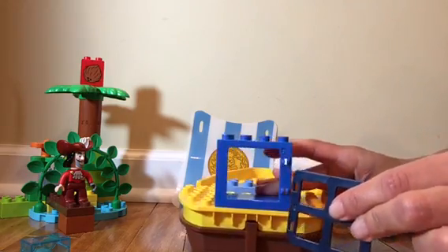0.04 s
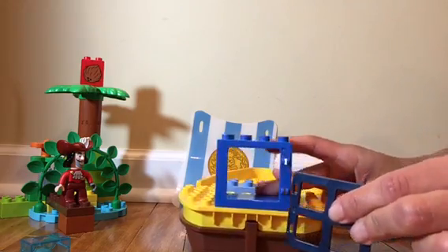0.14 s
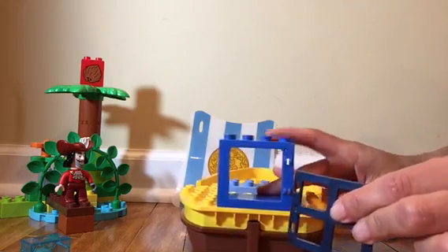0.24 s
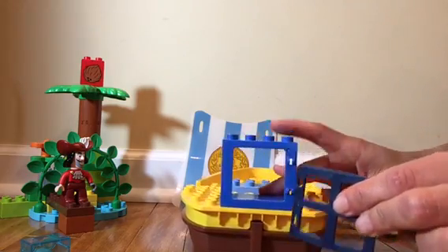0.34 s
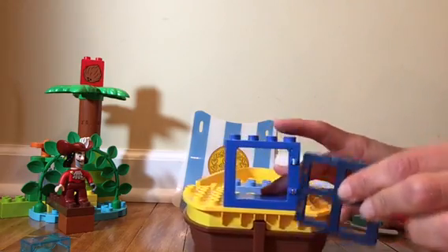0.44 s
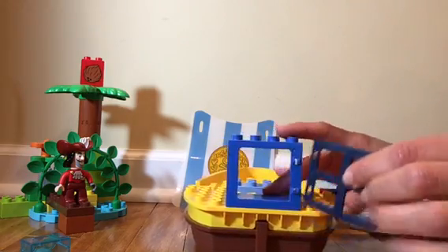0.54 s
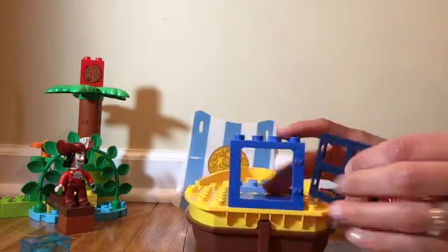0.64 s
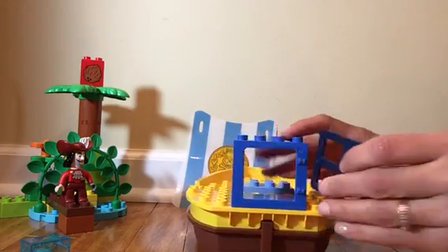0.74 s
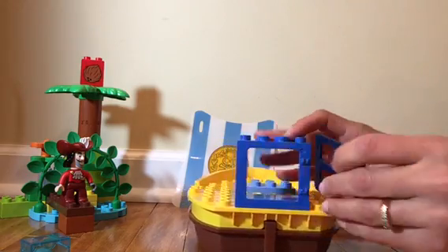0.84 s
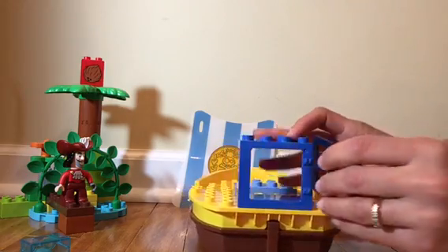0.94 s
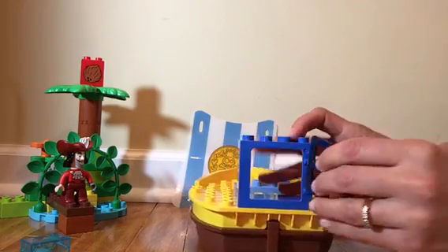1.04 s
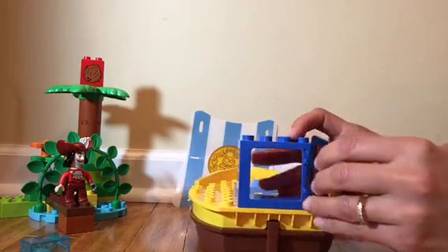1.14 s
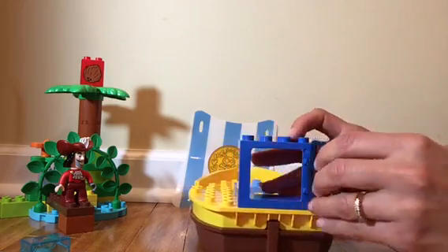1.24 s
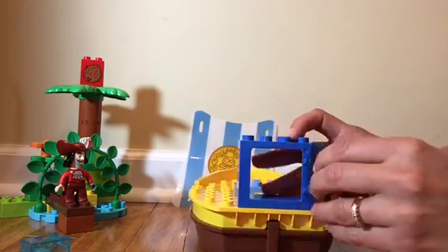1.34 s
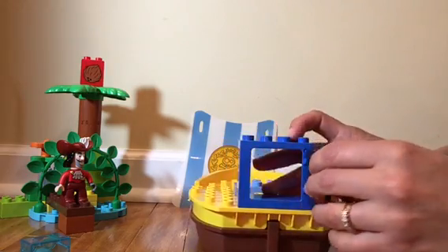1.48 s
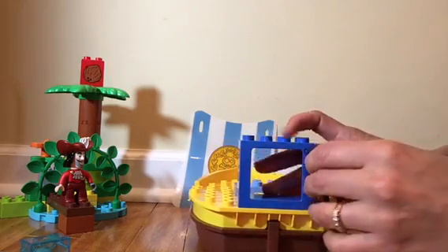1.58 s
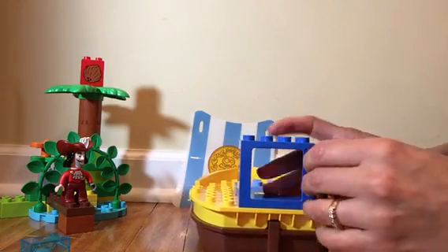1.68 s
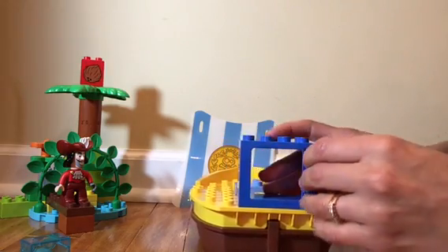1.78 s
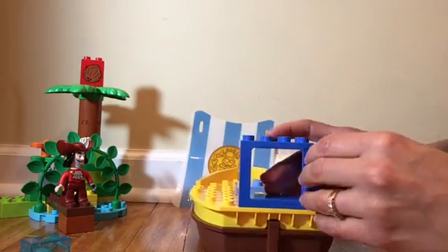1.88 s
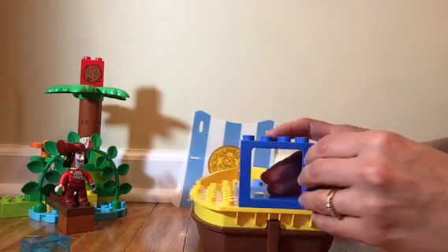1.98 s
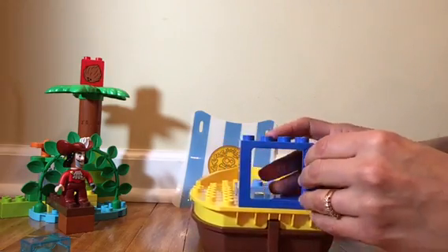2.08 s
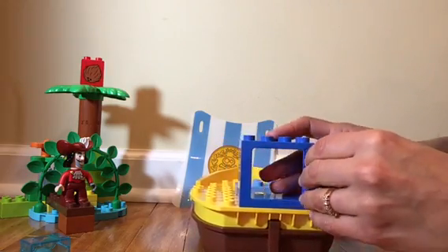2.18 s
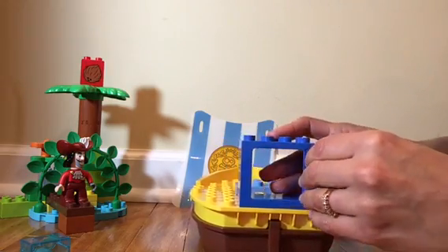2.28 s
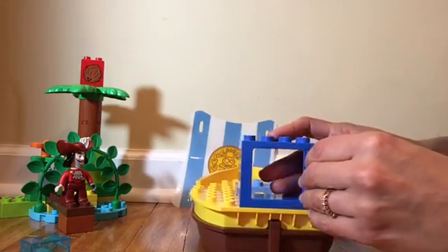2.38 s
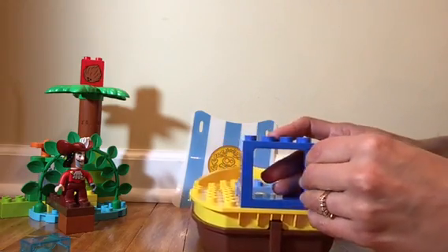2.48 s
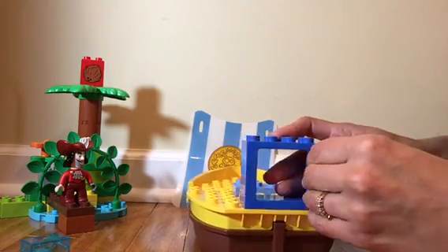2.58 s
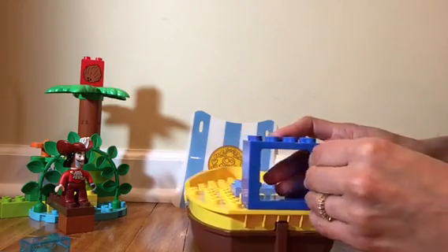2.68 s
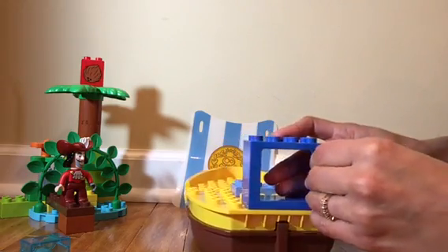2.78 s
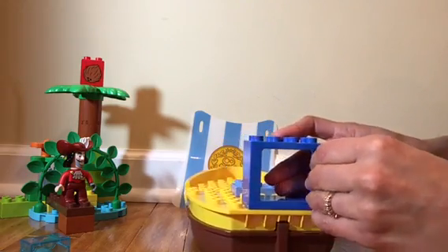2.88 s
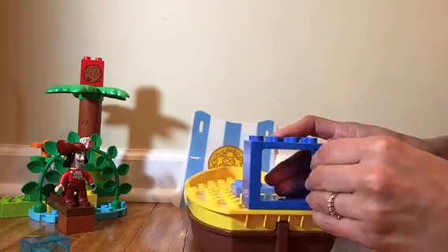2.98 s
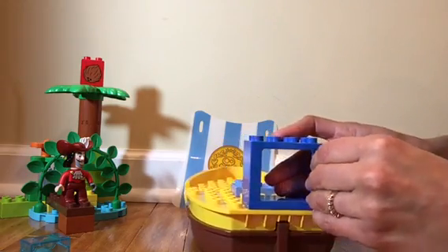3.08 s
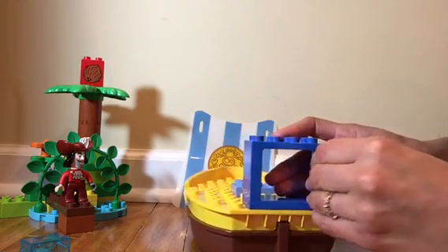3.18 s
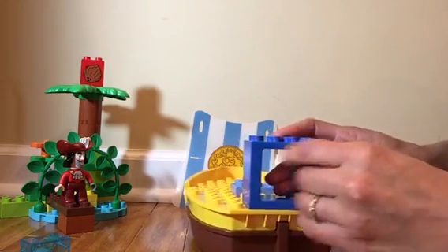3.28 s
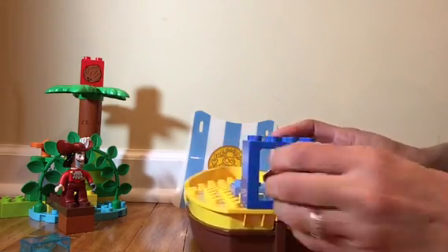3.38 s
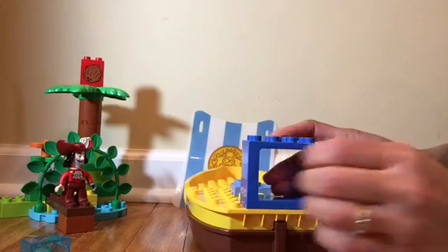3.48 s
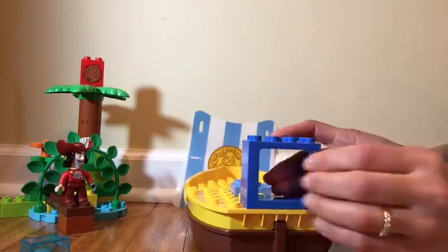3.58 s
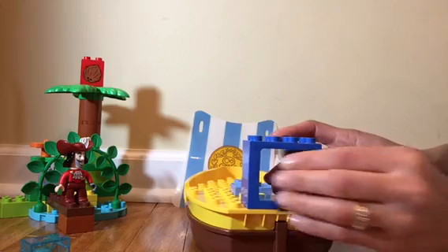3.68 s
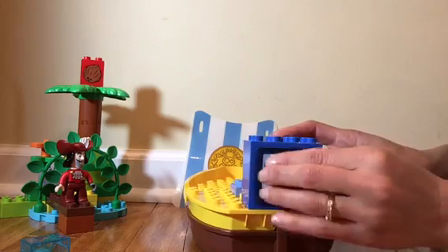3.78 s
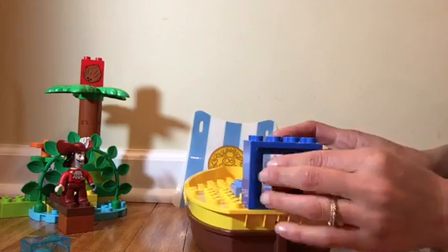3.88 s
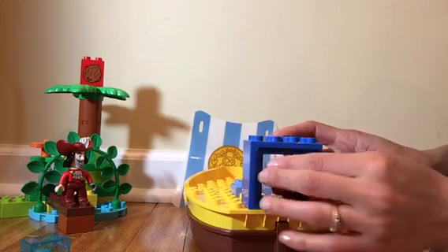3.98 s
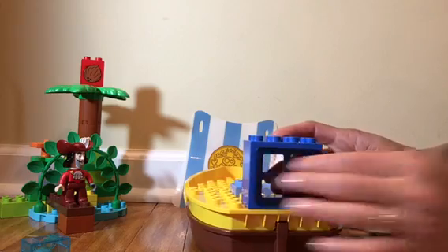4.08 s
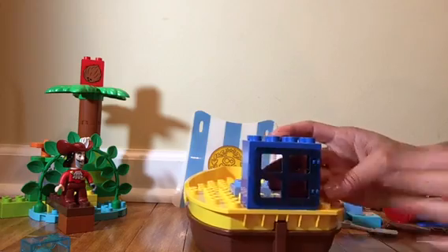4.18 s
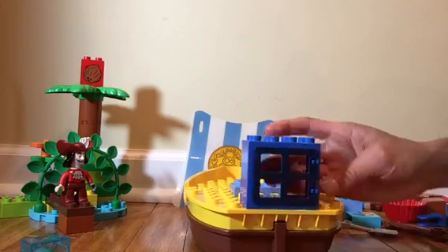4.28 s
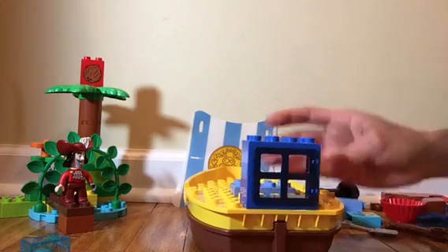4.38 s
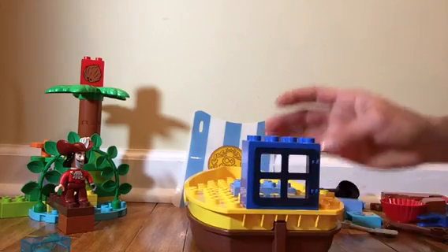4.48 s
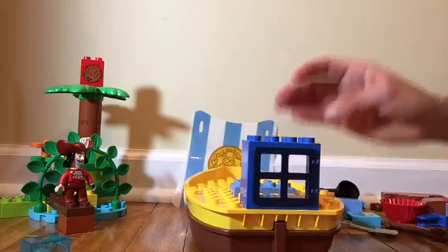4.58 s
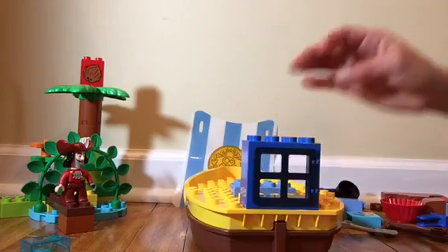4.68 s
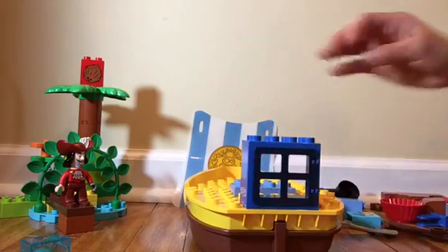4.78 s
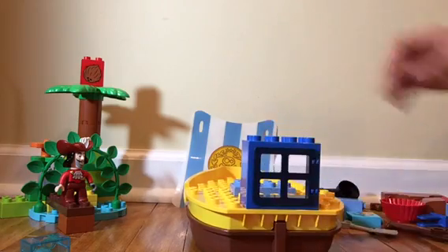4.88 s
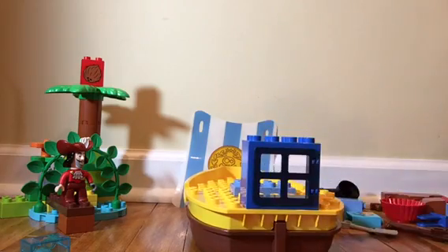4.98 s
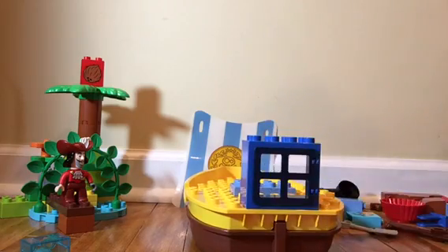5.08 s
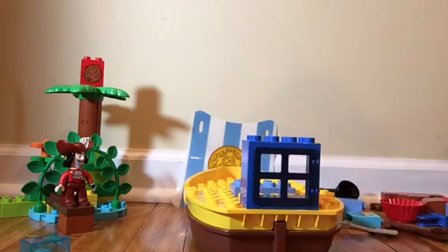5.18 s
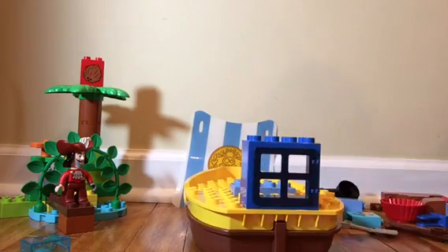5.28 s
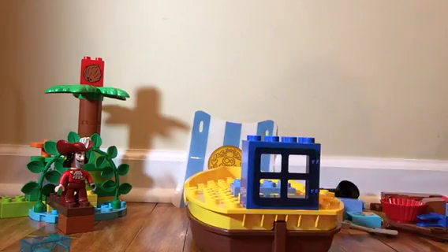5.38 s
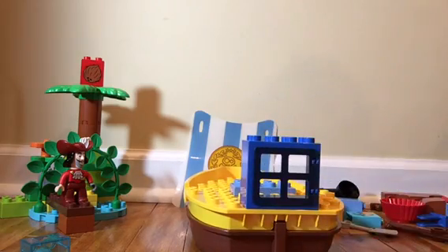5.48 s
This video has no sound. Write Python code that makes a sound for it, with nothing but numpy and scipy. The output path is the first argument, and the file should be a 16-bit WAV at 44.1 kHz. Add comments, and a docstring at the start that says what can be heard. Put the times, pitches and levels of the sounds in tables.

```python
"""A small quiet room with a wooden floor, one microphone close to a toy brick cabin on a hollow toy hull.
Hands press a plastic window frame into the cabin. Each contact is a short chatter of tiny blows
that rings hull, frame, studs and edges, and thuds in the floor. Between contacts fingers rub,
the toy rumbles on the boards, tight plastic squeaks and a piece scrapes.
The near walls answer, over a faint appliance hum and hiss."""
import sys
import numpy as np
from scipy import signal
from scipy.fft import rfft, irfft
from scipy.io import wavfile
from scipy.ndimage import uniform_filter1d

SR = 44100
rng = np.random.default_rng(int(sys.argv[2]) if len(sys.argv) > 2 else 0)


def materialize(psi):
    """Save the field psi as 16-bit PCM at rate SR to the path in sys.argv[1].

    A 1-D psi becomes a single channel; in a 2-D psi each row is a channel.
    """
    bounded = np.clip(np.atleast_2d(psi).T, -1, 1)
    quanta = np.round(bounded * 32767).astype(np.int16)
    wavfile.write(sys.argv[1], SR, quanta)


N = 244171

# modes of the plastic bodies: (pitch [Hz], level [dB], t60 [s])
HULL_MODES = [(490, -5, 0.03), (609, -4.5, 0.051), (767, -3, 0.048), (929, -2, 0.049), (1120, -2, 0.048),
              (1320, -6.5, 0.0079)]
FRAME_MODES = [(1510, -1.5, 0.011), (1713, -6.5, 0.042), (1810, -6.5, 0.013), (2088, 3.5, 0.025),
               (2490, -7.5, 0.039), (2614, 9.5, 0.0075), (2905, 3.5, 0.0067), (3310, -6, 0.029),
               (3567, 2, 0.033), (4010, 0, 0.033)]
STUD_MODES = [(4470, 3.5, 0.0067), (5560, -4.5, 0.014), (6140, -2, 0.0098), (6800, -4, 0.012),
              (7420, 1, 0.005), (8460, -2.5, 0.004)]
# hand movements: (start [s], length [s], relative rub level [dB], rub centre [Hz],
# rub spread [octaves], floor rumble [dB])
HAND_MOVES = [(-0.06, 0.15, -77.5, 940, 1.2, -65.5), (0.208, .13, -72, 1570, 1.2, -73),
              (0.375, 0.23, -73, 990, 0.84, -71), (0.71, .12, -77, 1000, .9, -73.5),
              (0.862, 0.18, -63.5, 1010, 0.77, -64.5), (1.36, 0.12, -73.5, 1190, 0.55, -85),
              (1.545, 0.14, -61.5, 790, 1.17, -77), (2.554, 0.23, -58.5, 1077, 1.05, -67.5),
              (4.317, 0.18, -64, 2992, 1.25, -70), (4.447, .16, -73.5, 2030, 1.32, -80),
              (4.862, 0.13, -68.5, 2700, 1.34, -78), (5.04, 0.18, -68, 1440, 1.27, -85)]


def contacts():
    """Tiny blows ring the plastic; the floor feels one slow push. Returns direct and all-round sound."""
    # (time [s], floor thud [dB], thud pitch [Hz], hull knock [dB], frame click [dB], stud tick [dB],
    # pitch of the struck piece [Hz], its ring [dB], chatter decay [ms])
    hits = [(1.082, -64, 328, -34, -30.5, -47, 1770, -26.5, 1.7),
            (1.086, -53, 269, -25, -29.5, -41, 1140, -28.5, 2.46),
            (1.12, -53.5, 234, -52, -48.5, -57, 1130, -35, 2.3),
            (1.161, -70, 100, -74, -63, -75, 934, -52.5, 4.9),
            (1.281, -64, 100, -54.5, -74, -87, 816, -71, 5.5),
            (1.3, -90, 100, -53, -66, -75, 920, -53.5, 7.6),
            (1.318, -71.5, 100, -70, -64, -83, 900, -61, 7.8),
            (1.384, -59, 100, -91, -69, -92, 1060, -64, 9.9),
            (1.442, -82, 100, -57, -62, -96, 991, -48, 7.8),
            (1.576, -80, 100, -47, -63, -68, 937, -73, 0.98),
            (1.61, -49, 328, -38, -39.5, -43, 1050, -52, 1.7),
            (1.614, -72, 135, -34.5, -36, -48.5, 1020, -26, 2.6),
            (1.797, -89, 100, -57, -69, -87, 1110, -88, 5.6),
            (1.931, -53, 137, -52, -56.5, -70, 1730, -62, 4.8),
            (1.973, -46.5, 252, -36.5, -44.5, -48.5, 764, -59, 1.94),
            (2.205, -68, 100, -81, -62.5, -74, 929, -59, 5.3),
            (2.741, -31, 95.3, -34, -29.5, -39, 1080, -30.5, 2),
            (2.942, -24, 235, -19, -11.5, -17, 2180, -6.5, 1.25),
            (3.312, -62, 99.5, -62, -63, -69, 746, -66, 3.3),
            (3.338, -57, 131.5, -60.5, -62, -84, 931, -60, 6.2),
            (3.361, -70, 99, -49.5, -49, -63, 1080, -58, 5.6),
            (3.374, -46, 205, -44.5, -49, -61, 1520, -41, 2.5),
            (3.381, -36, 193, -27.5, -64, -76, 762, -25.5, 0.7),
            (3.628, -62.5, 98.4, -56, -57, -77, 767, -49.5, 3.04),
            (3.839, -32.5, 328, -22, -12.5, -12.5, 3650, -22, 2.7),
            (3.847, -51, 243, -19, -30.5, -23.5, 3670, -19, 1.37),
            (4.099, -64, 200, -48, -60.5, -78, 507, -45.5, 3.5),
            (4.295, -49, 253, -69, -55, -69, 700, -53.5, 6.3),
            (4.674, -68, 100, -68, -59, -61, 3010, -50, 2.93),
            (5.222, -44.5, 188.3, -54, -60.5, -69, 929, -71, 2.3),
            (5.33, -78, 175, -44.5, -34, -65, 2020, -37, 3.5),
            (5.344, -43.5, 268, -25.5, -20, -79, 3890, -33, 2.7),
            (5.359, -40.5, 102, -33, -69, -98, 695, -35.5, 3),
            (5.44, -57, 207, -45, -42, -52, 2250, -53, 5.8),
            (5.449, -56, 220, -43.5, -40.5, -75, 3140, -67, 8.7),
            (5.487, -56, 139, -45.5, -50, -52.5, 3150, -48, 4.6)]
    # modes of the floorboards and of the brick edges: (pitch [Hz], level [dB], t60 [s])
    floor_modes = [(101.6, 3, 0.16), (129.83, -3.5, 0.13), (167, -3, 0.15), (200, -4, 0.11),
                   (263.3, 4, 0.092), (376, -3, 0.14)]
    edge_modes = [(9280, 2.5, 0.0034), (11400, -3, 0.0035), (11900, -2.5, .003), (13300, -2.5, 0.0047),
                  (14600, -1.5, .003)]
    thud_rise_s, blow_s, piece_t60_s = .0045, .002, .012
    out, t = np.zeros((2, N + SR)), np.arange(SR // 3) / SR
    short, ms = t[:SR // 10], t[:1500] * 1000
    blur = np.exp(-short / .0022)  # heard from all sides, neighbouring modes merge
    for start, floor_db, floor_hz, hull_db, frame_db, stud_db, hz, piece_db, chatter_ms in hits:
        chance = rng.standard_normal((6, 10, 3))
        timing, strength = rng.random((2, len(ms)))
        force = (1 - np.exp(-ms / (.3 * chatter_ms))) * np.exp(-ms / chatter_ms)
        blows = (timing < .3) * (2 * strength - 1) * force
        thud = ring(favour(floor_modes, floor_hz, fall_db=5.5), t, chance[5])
        thud *= (1 - np.exp(-t / thud_rise_s)) ** 2
        contact = np.tile(amp(floor_db) * thud / np.abs(thud).max(), (2, 1))
        edge_db = stud_db - 4 + .2 * (stud_db + 15)  # softer ticks have less edge fizz
        bodies = [(favour(HULL_MODES, hz, fall_db=1.5), hull_db),
                  (favour(FRAME_MODES, hz, fall_db=3), frame_db),
                  (STUD_MODES, stud_db), (edge_modes, edge_db), ([(hz, 0, piece_t60_s)], piece_db)]
        gain = np.sqrt((blow_s + chatter_ms / 1000) / 2 / short[-1])  # longer chatter, more energy
        for (modes, db), scatter in zip(bodies, chance):
            # a small body pushes little air below its lowest mode
            one_blow = highpass(ring(modes, short, scatter), .6 * modes[0][0])
            chatter = signal.fftconvolve(one_blow, blows)[:len(short)]
            contact[:, :len(short)] += amp(db) * gain * np.array([unit(chatter), unit(one_blow * blur)])
        i = int(start * SR)
        out[:, i:i + len(t)] += contact
    return out[:, :N]


def ring(modes, t, scatter):
    """Decaying sines; every blow lands elsewhere and shares its force differently."""
    hz, db, t60 = np.transpose(modes)[:, :, None]
    level, polarity, detune = scatter[:len(hz)].T[:, :, None]
    sines = np.sign(polarity) * np.sin(2 * np.pi * hz * (1 + .017 * detune) * t)
    return (amp(db + 2 * level - 60 * t / t60) * sines).sum(axis=0)


def favour(modes, hz, fall_db):
    """A blow excites most the modes near its own pitch."""
    return [(f, db - fall_db * np.log2(f / hz) ** 2, t60) for f, db, t60 in modes]


def scrape():
    """A piece drags over studs: dense, uneven stick-slip clicks ring it and tick in the treble."""
    # course of the drag: (time [s], level [dB])
    drag = [(5.285, -85.5), (5.305, -35), (5.329, -38.5), (5.337, -48), (5.352, -68), (5.37, -55.5),
            (5.476, -42.5), (5.488, -44), (5.497, -44.5), (5.53, -80)]
    # resonances of the piece: (pitch [Hz], unused width [Hz], level [dB])
    piece_modes = [(700, 46, 7), (1262, 29, 4.5), (1690, 37, 3), (2194, 87, 6), (2650, 30, 1),
                   (3060, 57, 6.5), (3720, 33, -1), (3700, 87, -29), (4355, 140, -14)]
    slips_per_s, width_hz, treble_db = 3000, 180, -22
    level = amp(np.interp(np.arange(N) / SR, *np.transpose(drag), left=-120))
    slips = (rng.random(N) < slips_per_s / SR) * rng.standard_normal(N) * amp(.86 * walk(120))
    body = unit(sum(amp(db) * unit(band(slips, hz, width_hz)) for hz, _, db in piece_modes))
    treble = sum(gain * unit(band(slips, hz, width))
                 for hz, width, gain in [(6800, 570, 1), (8560, 700, .5), (11500, 6000, .36)])
    return level * (body + amp(treble_db) * unit(treble))


def finger_rubs():
    """Skin slips in soft grains and stirs the plastic's modes near a centre set by the sliding speed."""
    db, centre_hz, octaves = np.transpose(HAND_MOVES)[2:5]
    grain, swell, out = amp(1.5 * walk(90)), swells(), 0
    for hz, _, _ in HULL_MODES + FRAME_MODES[::2] + STUD_MODES:
        mode = unit(band(rng.standard_normal(N), hz, hz / 4)) * amp(2.2 * walk(25))
        drive = amp(db) * np.exp(-(np.log2(hz / centre_hz) / octaves) ** 2)
        out += mode * (drive @ swell)
    return .5 * out * grain


def floor_rumble():
    """Low, uneven noise from hands shifting the toy on the boards."""
    level = amp(np.transpose(HAND_MOVES)[5]) @ swells()
    return level * amp(2.5 * walk(25)) * unit(band(rng.standard_normal(N), hz=238, width=265))


def swells():
    """One smooth swell, hold and fade for each hand movement."""
    rise_share, fall_share = .35, .48
    start, length = np.transpose(HAND_MOVES)[:2, :, None]
    progress = (np.arange(N) / SR - start) / length
    ramp = np.clip(np.minimum(progress / rise_share, (1 - progress) / fall_share), 0, 1)
    return np.sin(np.pi / 2 * ramp) ** 2


def squeaks():
    """Tight plastic gives thin, slightly unsteady tones that start quickly and fade."""
    # faint squeaks: (start [s], length [s], pitch [Hz], level [dB])
    tones = [(1.38, 0.034, 2990, -68), (2.381, 0.044, 3880, -67.5)]
    t, waver, out = np.arange(N) / SR, 1 + .006 * walk(61), 0
    for start, length, hz, db in tones:
        envelope = np.sin(np.pi * np.sqrt(np.clip((t - start) / length, 0, 1)))
        out += amp(db) * envelope * np.sin(2 * np.pi * np.cumsum(hz * waver) / SR)
    return out


def room(x):
    """A few near walls, then a diffuse tail that dies faster in the high treble."""
    # decay of the tail: (frequency [Hz], t60 [s])
    decay = [(100, 0.35), (500, 0.39), (1000, .35), (2000, 0.43), (5000, 0.38), (14000, 0.067)]
    # colour of the tail: (frequency [Hz], relative level [dB])
    colour = [(100, 13.5), (500, 0), (1000, -4), (2300, -4), (5000, -1), (14000, 9)]
    # echoes off the near walls: (delay [s], level [dB])
    echoes = [(.008, -17), (.021, -19), (.033, -23)]
    tail_db, rise_s = -13, .002
    t, tail = np.arange(SR // 2) / SR, 0
    for hz in 80 * 2 ** np.arange(0, 7.6, .5):
        envelope = amp(on_log(hz, colour) - 60 * t / on_log(hz, decay))
        tail += envelope * band(rng.standard_normal(len(t)), hz, hz / .85)
    tail *= 1 - np.exp(-t / rise_s)
    tail *= amp(tail_db) / np.linalg.norm(tail)
    for delay, db in echoes:
        smear = rng.standard_normal(400) * np.exp(-t[:400] / .003)  # rough walls scatter each echo
        i = int(delay * SR)
        tail[i:i + 400] += amp(db) * smear / np.linalg.norm(smear)
    return signal.fftconvolve(x, tail)[:N]


def room_tone():
    """Faint, slightly restless hiss above a steady bed of bass noise."""
    # spectrum of the hiss: (frequency [Hz], relative density [dB])
    spectrum = [(15, -61), (25, -31), (53, -21), (64, 1), (87, -8.5), (175, -33), (217, -23), (476, -30),
                (516, -35), (624, -32.5), (3160, -39), (3820, -40), (4870, -40.5), (14400, -49),
                (16000, -60.5)]
    hiss_db, bass_db, split_hz = -71, -75, 120
    hz = np.fft.rfftfreq(N, 1 / SR)
    hiss = irfft(rfft(rng.standard_normal(N)) * amp(on_log(hz, spectrum)) * (hz > split_hz), N)
    hump = amp(-6 * np.log2(np.maximum(hz, 1) / 100) ** 2)
    bass = irfft(rfft(rng.standard_normal(N)) * hump * (hz <= split_hz), N)
    return amp(hiss_db + .8 * walk(3)) * unit(hiss) + amp(bass_db) * unit(bass)


def appliance_hum():
    """A low wavering tone with a narrow band of noise around it."""
    hz, db = 81, -63
    tone = np.sin(2 * np.pi * np.cumsum(hz + 3 * walk(7)) / SR)
    noise = unit(band(rng.standard_normal(N), hz, width=18))
    return amp(db) * unit(tone + .2 * noise)


def amp(db):
    """Decibels to amplitude."""
    return 10 ** (np.asarray(db) / 20)


def on_log(hz, table):
    """Read a (frequency [Hz], value) table on a log-frequency axis."""
    f, value = np.transpose(table)
    return np.interp(np.log(np.maximum(hz, 1)), np.log(f), value)


def unit(x):
    """Scale to an RMS of 1."""
    return x / np.sqrt(np.mean(x ** 2))


def band(x, hz, width):
    """A resonance applied twice for steep flanks, gain 1 at the centre."""
    b, a = signal.iirpeak(hz, hz / width, fs=SR)
    return signal.lfilter(b, a, signal.lfilter(b, a, x))


def highpass(x, hz):
    """Bass roll-off of 12 dB an octave."""
    return signal.sosfilt(signal.butter(2, hz, "high", fs=SR, output="sos"), x)


def walk(rate):
    """Random levels held 1 / rate s and slewed twice."""
    hold = int(SR / rate)
    steps = np.repeat(rng.standard_normal(N // hold + 1), hold)
    return 1.1 * uniform_filter1d(uniform_filter1d(steps, hold), hold)[:N]


def scene():
    """At the microphone, in mono: the toy up close, the room behind it."""
    direct, all_round = contacts()
    friction = finger_rubs() + scrape() + squeaks()
    toy = direct + friction + floor_rumble()
    return (toy + room(all_round + friction) + room_tone() + appliance_hum())[None]


def record(dry):
    """The microphone drops the deepest bass; the chain rounds the loudest peaks and cuts the top."""
    low_hz, top_hz, ceiling = 39.7, 15700, .8
    rounded = ceiling * np.tanh(highpass(dry, low_hz) / ceiling)
    return signal.sosfilt(signal.ellip(8, .2, 60, top_hz, fs=SR, output="sos"), rounded)


dry = scene()
out = record(dry)
materialize(out)
```